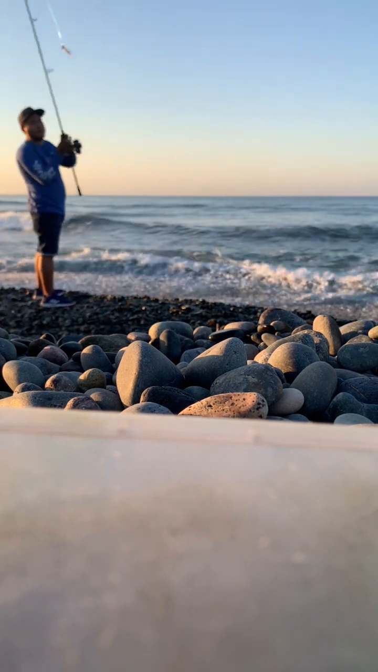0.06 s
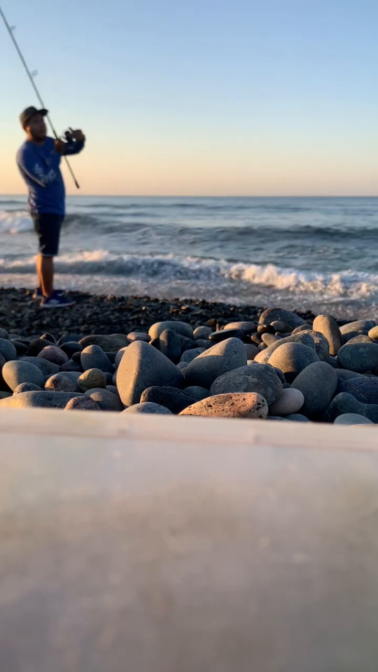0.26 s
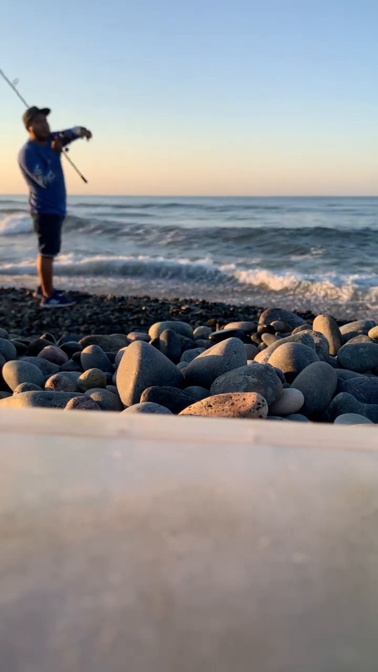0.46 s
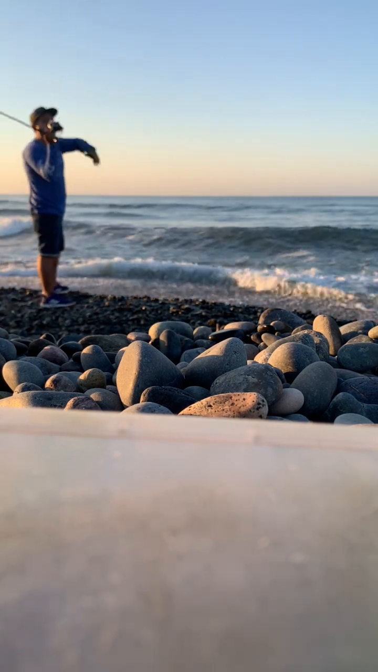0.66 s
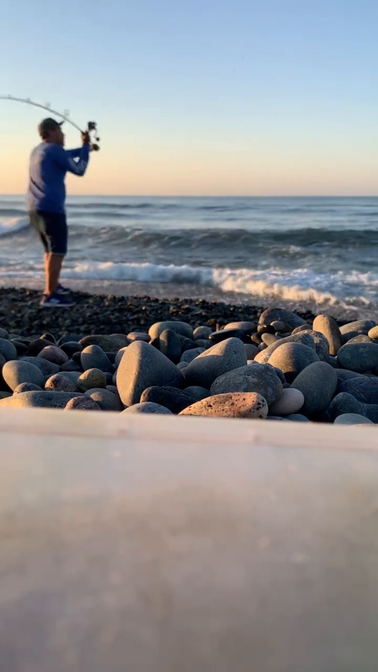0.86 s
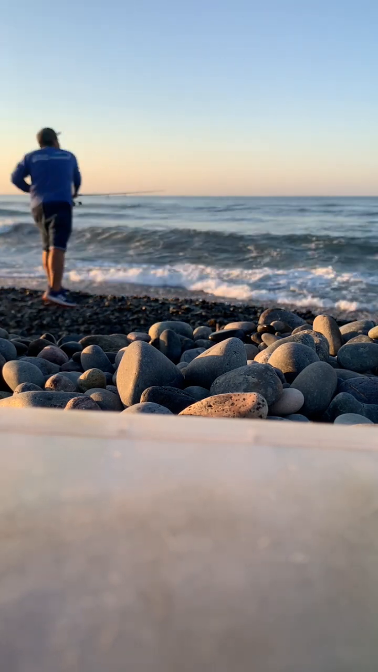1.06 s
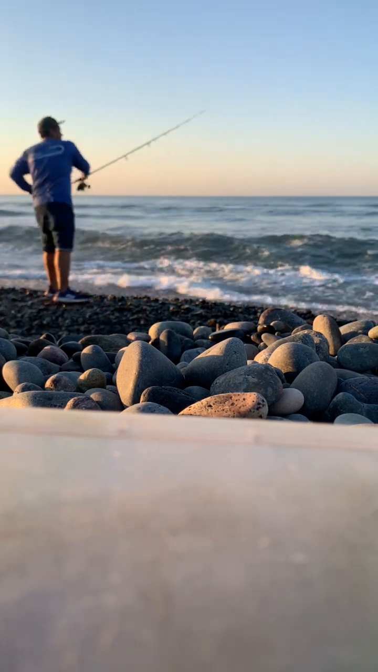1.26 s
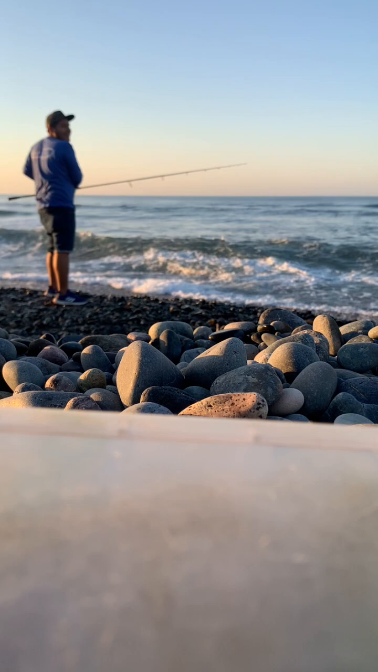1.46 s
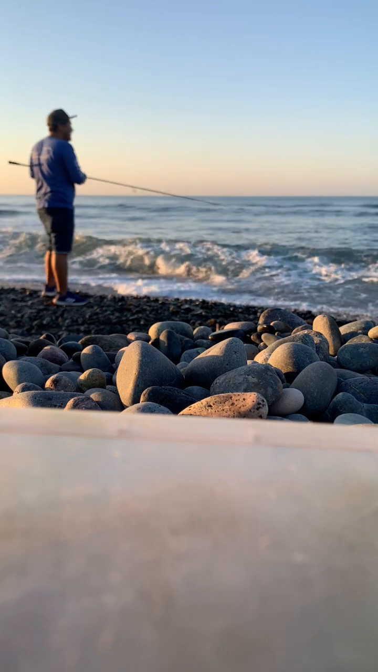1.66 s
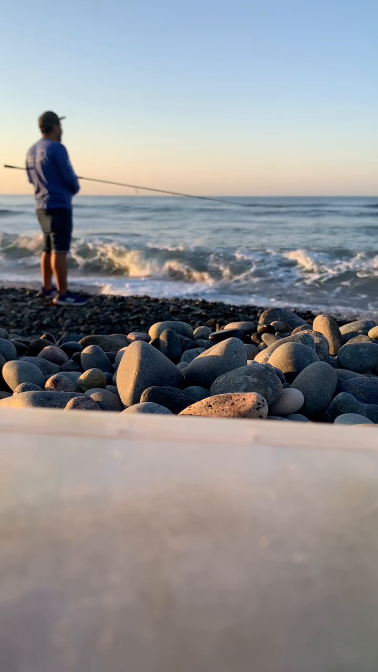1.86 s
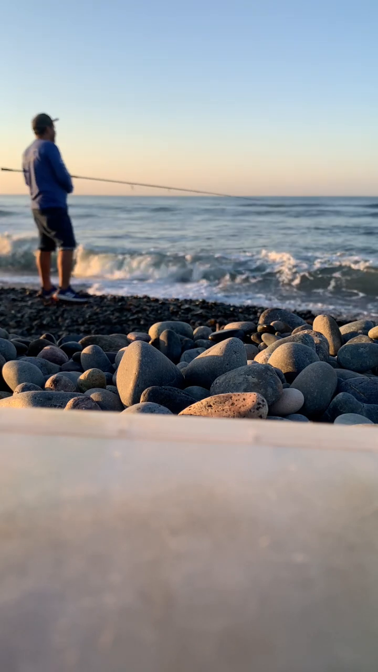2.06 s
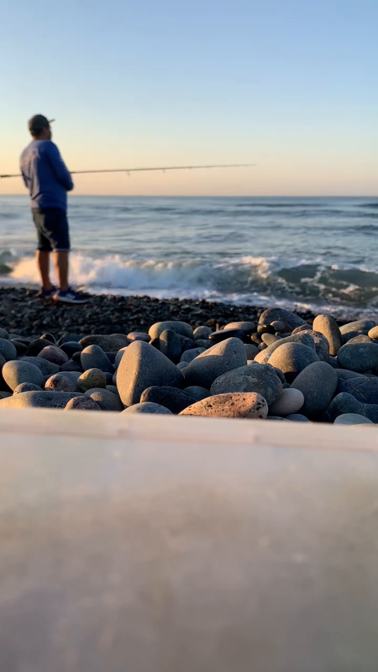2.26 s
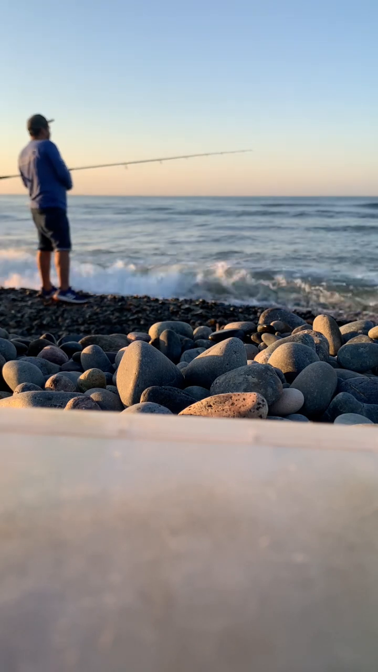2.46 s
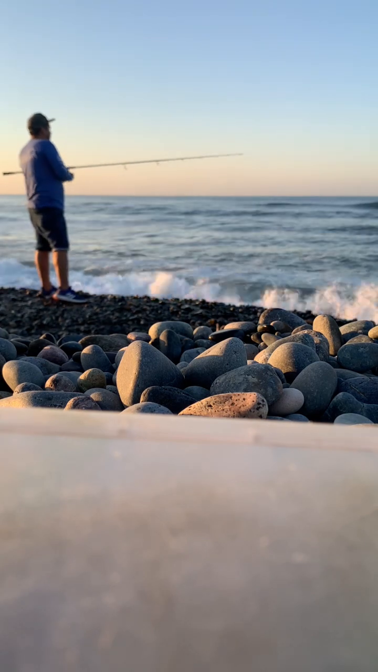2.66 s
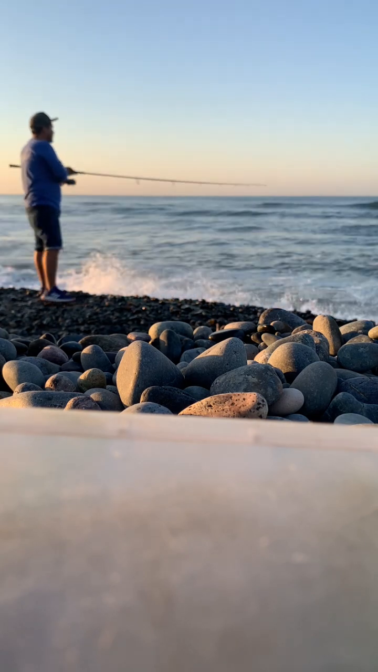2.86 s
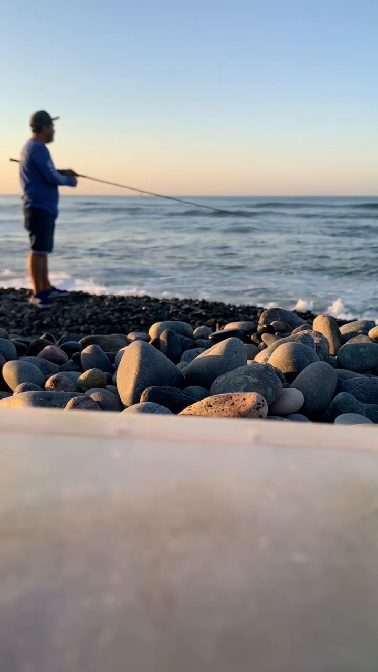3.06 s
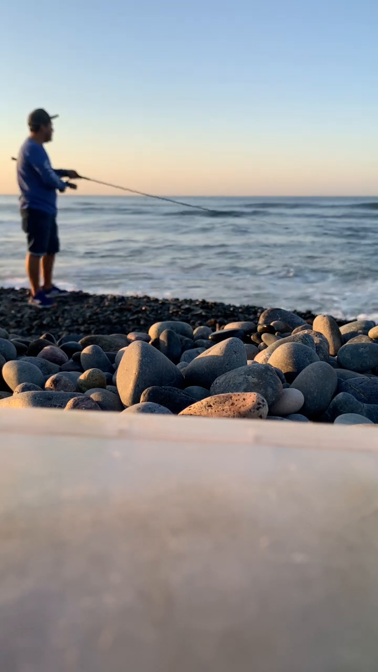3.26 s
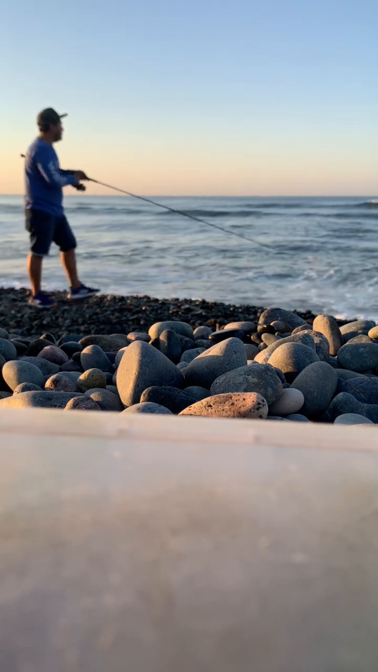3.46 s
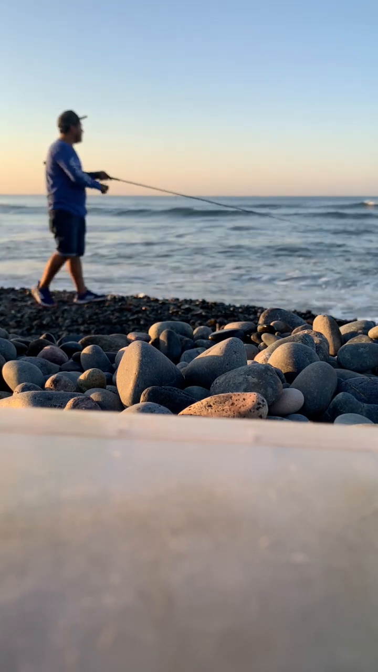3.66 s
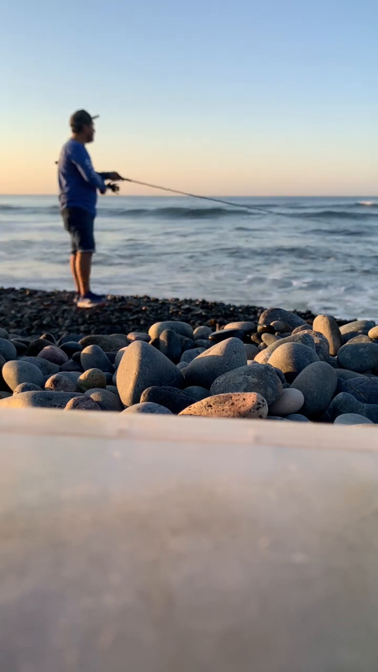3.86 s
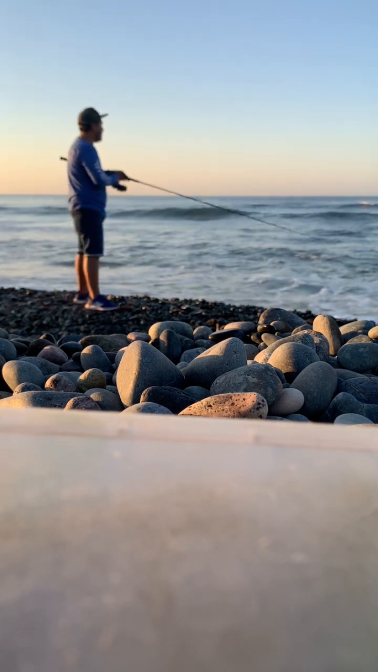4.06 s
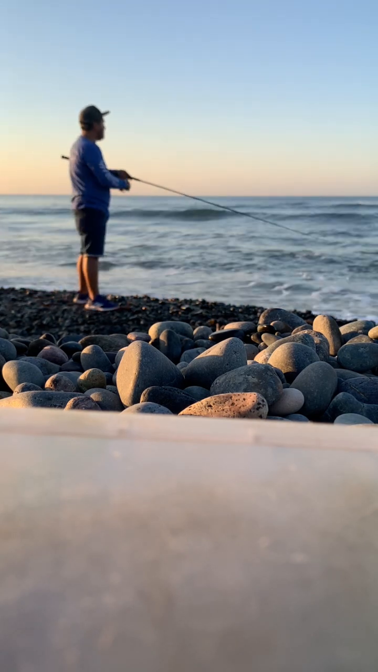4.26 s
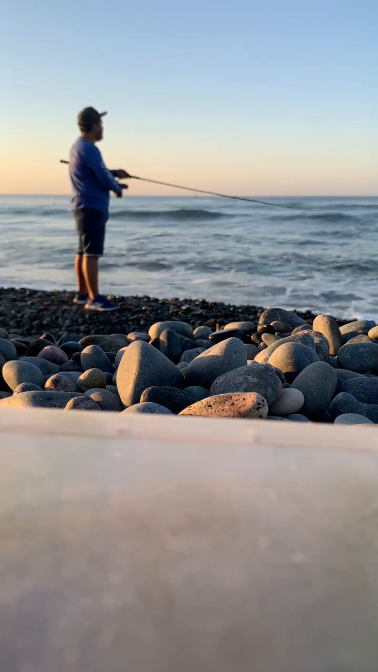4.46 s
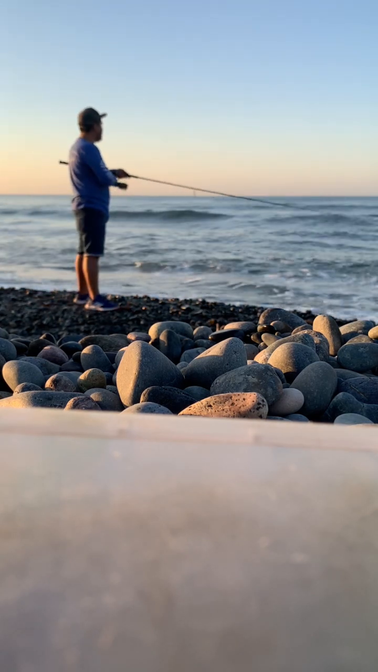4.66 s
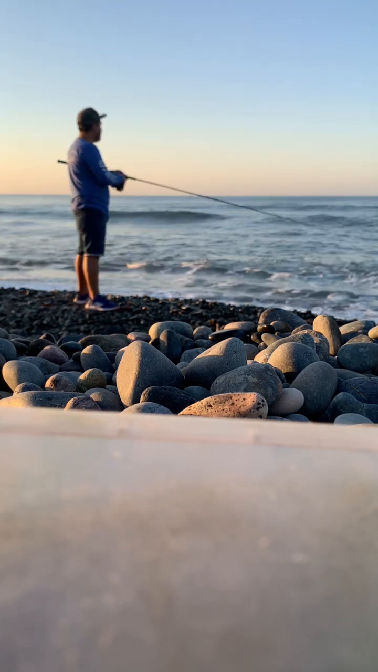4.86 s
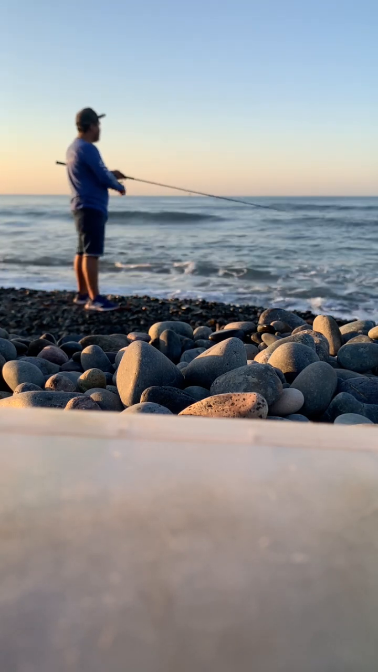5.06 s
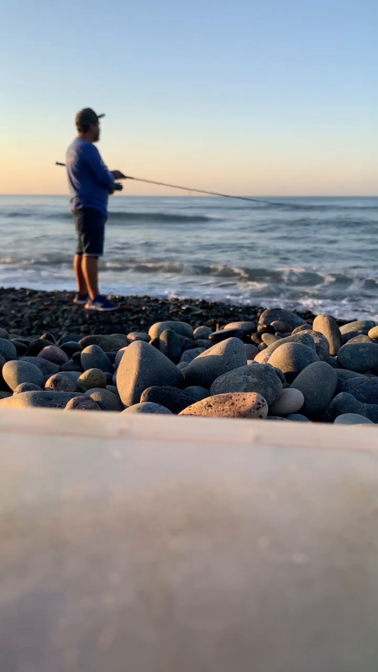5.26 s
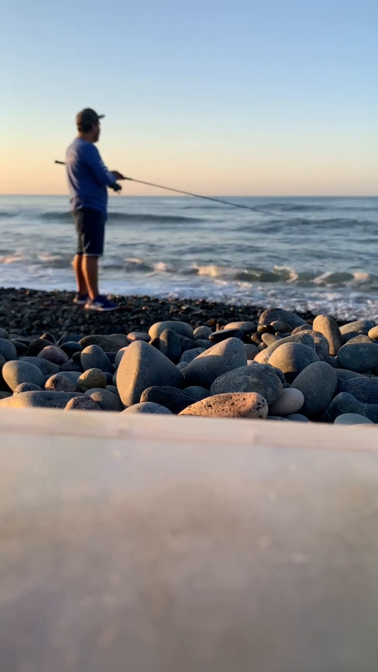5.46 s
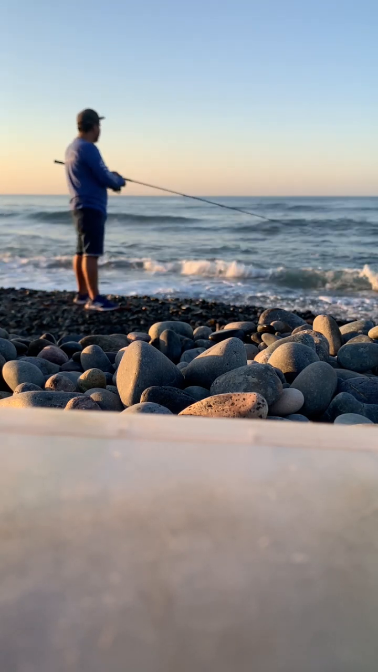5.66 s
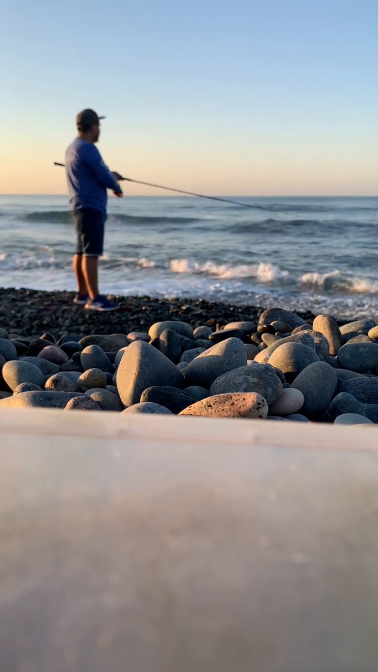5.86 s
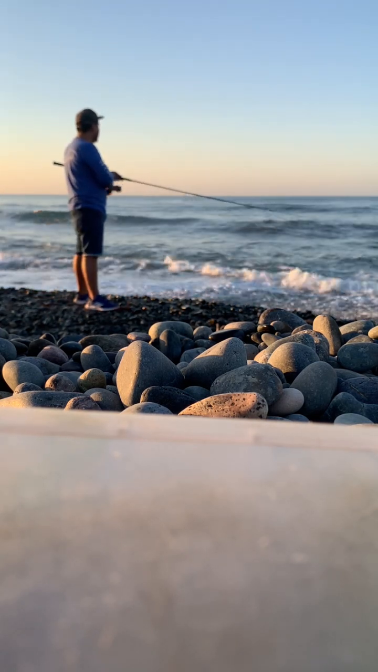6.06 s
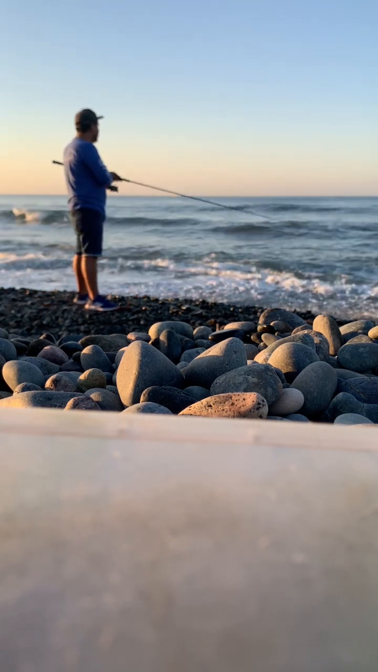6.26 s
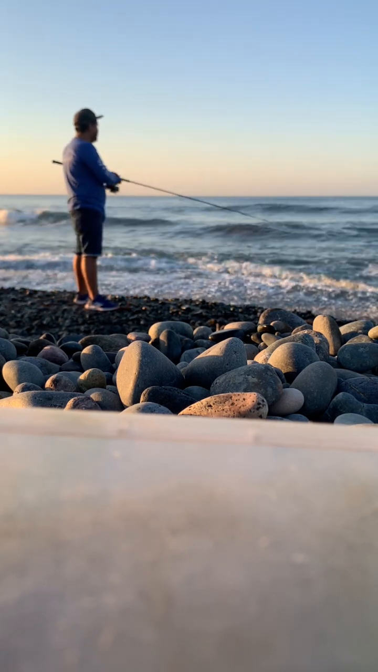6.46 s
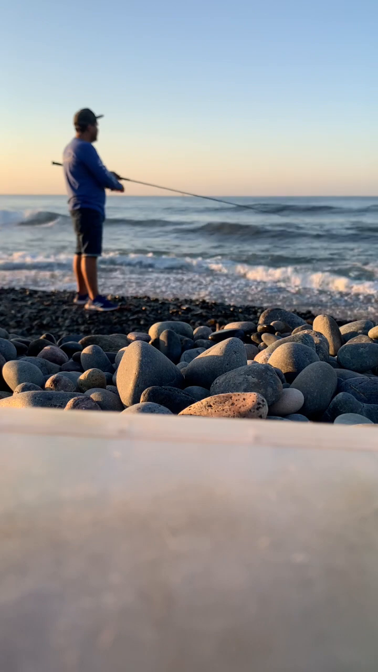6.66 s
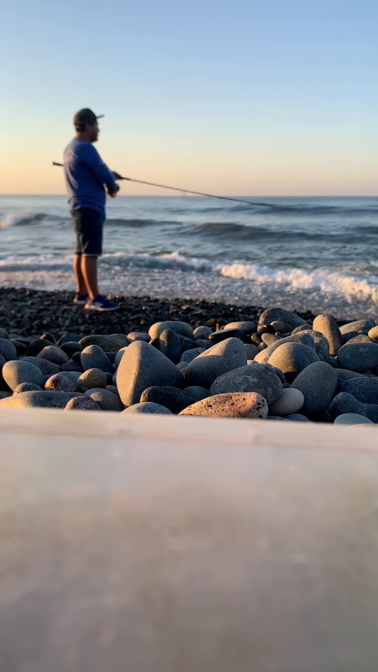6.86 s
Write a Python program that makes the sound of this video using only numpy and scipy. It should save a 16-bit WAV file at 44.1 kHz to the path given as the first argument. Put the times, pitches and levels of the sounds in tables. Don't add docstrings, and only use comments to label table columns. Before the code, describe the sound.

Close surf on a cobble beach, outdoors. Breakers rumble and foam, then a very brief whistling swish of a fishing rod and a small click. A bigger wave collapses with low gulping thuds, then drops away into a lull where fine reel ticks and stone knocks show. Hiss rises again through the stones and another wave breaks. Phone microphone a few metres up the shore, stereo, natural.

```python
import sys
import numpy as np
from scipy import signal
from scipy.fft import rfft, irfft, next_fast_len
from scipy.io import wavfile
from scipy.ndimage import uniform_filter1d

SR = 44100
rng = np.random.default_rng(int(sys.argv[2]) if len(sys.argv) > 2 else 0)


def generate_wav(sig):
    pcm = np.round(np.clip(np.atleast_2d(sig).T, -1, 1) * 32767).astype(np.int16)
    wavfile.write(sys.argv[1], SR, pcm)


def invert_db(level):
    return 10 ** (np.asarray(level, dtype=float) / 20)


N = 304731
SIZE = next_fast_len(N)
HZ = np.maximum(np.arange(SIZE // 2 + 1) * SR / SIZE, 1)
USUAL_DB = -27

# (time [s], level [dB])
CHURN_LEVEL = [(0.0, -26.5), (0.3, -22), (0.8, -22), (1.0, -26), (1.78, -26.5), (1.98, -20.5), (2.5, -21),
               (2.92, -20), (3.02, -27.5), (3.4, -32), (3.7, -30.5), (4.0, -35), (4.4, -32.5), (4.9, -31.5),
               (5.6, -30), (6.22, -29), (6.5, -26), (6.91, -23)]
# (time [s], level [dB])
FLOW_LEVEL = [(0.0, -26), (0.83, -27.5), (1.54, -33), (2.27, -35), (2.55, -31.5), (2.68, -32), (2.92, -36),
              (3.35, -42.5), (3.6, -48), (3.8, -48), (3.98, -43), (4.18, -39), (4.3, -35.5), (4.5, -33),
              (4.94, -28.5), (5.4, -26.5), (5.9, -25.5), (6.3, -26), (6.91, -26.5)]


def over_time(table):
    return np.interp(np.arange(N) / SR, *np.transpose(table))


def on_hz(table, column):
    table = np.array(table, float)
    return np.interp(np.log(HZ), np.log(table[:, 0]), table[:, column])


def unit(x):
    return x / np.sqrt(np.mean(x[0] ** 2))


def walk(rate):
    k = int(SR / rate)
    held = np.repeat(rng.standard_normal(N // k + 1), k)
    return 1.22 * uniform_filter1d(uniform_filter1d(held, k), k)[:N]


def lagging(x, lag_s):
    k = 1 / (max(lag_s, .01) * SR)
    return x[0] + signal.lfilter([k], [1, k - 1], x - x[0])


def bursts(per_s, spread_db):
    hit = rng.random((2, N)) < per_s / SR
    return hit * rng.standard_normal((2, N)) * invert_db(spread_db * rng.exponential(size=(2, N)))


def water(colour, per_s, spread_db, surge_db, flicker_db, flicker_per_s):
    low_hz, high_hz = colour[0][0], colour[-1][0]
    crowd = rfft(bursts(per_s, spread_db), SIZE) * invert_db(on_hz(colour, column=1))
    crowd *= (HZ > .7 * low_hz) & (HZ < 1.4 * high_hz)
    surge = surge_db * walk(16)
    out = 0
    for centre in np.arange(np.floor(2 * np.log2(low_hz)) - 1, 2 * np.log2(high_hz) + 2):
        band = np.cos(np.pi / 2 * np.clip(2 * np.log2(HZ) - centre, -1, 1)) ** 2
        flicker = flicker_db * walk(flicker_per_s)
        out = out + irfft(crowd * band, SIZE)[:, :N] * invert_db(surge + flicker)
    return unit(out)


def slaps():
    # (time [s], rise of the churn [dB])
    lips = [(0.0, 4.5), (0.07, 0), (0.31, -1), (0.5, -0.5), (0.77, -1.5), (0.92, 1), (1.87, 0), (2.5, 0.5),
            (2.67, 0.5), (2.71, 0), (5.39, 0), (5.7, 2), (5.92, 3), (6.3, 1), (6.54, 1), (6.7, 0.5)]
    rise_s, fall_s = 0.015, 0.12
    out = 0
    for s, db in lips:
        t = np.arange(N) / SR - s
        out = out + db * np.exp(np.minimum(t / rise_s, -t / fall_s))
    return out


def thud(slap_db):
    # (frequency [Hz], density [dB per Hz])
    thud_colour = [(80, -26), (120, -13.5), (170, -2.5), (250, -2.5), (350, -2.5), (500, -6.5),
                   (800, -13.5)]
    crowd = water(thud_colour, 5000, spread_db=1.0, surge_db=.2, flicker_db=.4, flicker_per_s=6)
    return invert_db(over_time(CHURN_LEVEL) + slap_db + 2) * crowd


def roar(slap_db):
    # (frequency [Hz], density [dB per Hz])
    roar_colour = [(150, -18), (250, -15), (400, -7), (550, -3.5), (760, -0.5), (1000, -5), (1200, -9),
                   (1500, -9), (2000, -16.5), (3000, -26), (4500, -32), (6000, -70)]
    # (time [s], level [dB])
    foam_level = [(0.0, -23.5), (.3, -22.5), (.92, -21.5), (1.05, -22), (1.4, -26.5), (1.8, -23),
                  (2.05, -18.5), (2.6, -16.5), (2.88, -16.5), (3.02, -19.5), (3.38, -20.5), (3.7, -25),
                  (4.25, -30.5), (4.85, -30.5), (5.2, -25), (5.85, -23.5), (6.2, -24), (6.91, -21.5)]
    crowd = water(roar_colour, 14000, spread_db=1.0, surge_db=.3, flicker_db=.6, flicker_per_s=9)
    return invert_db(over_time(foam_level) + slap_db) * crowd


def wash(slap_db):
    # (frequency [Hz], density [dB per Hz])
    wash_colour = [(700, -24), (1200, -1), (1600, -0.5), (2050, 0), (2500, -1.5), (3100, -2.5), (3800, -6),
                   (5000, -13), (6200, -21), (7000, -14), (9000, -24), (12000, -33), (16000, -56)]
    crowd = water(wash_colour, 22000, spread_db=1.77, surge_db=0.77, flicker_db=0.54, flicker_per_s=14)
    return invert_db(over_time(FLOW_LEVEL) + 0.33 * slap_db + 5) * crowd


def trickle():
    # (frequency [Hz], density [dB per Hz])
    gap_colour = [(2200, -15), (2700, -3.5), (3200, 0), (3900, -3.5), (4800, -14)]
    crowd = water(gap_colour, 5000, spread_db=2.5, surge_db=0.1, flicker_db=0.6, flicker_per_s=20)
    flow_db = over_time(FLOW_LEVEL)
    rise_db = np.clip(flow_db - lagging(flow_db, lag_s=0.38), -6, 9)
    return invert_db(flow_db - 6 + 0.85 * rise_db) * crowd


def spray(slap_db):
    # (frequency [Hz], density [dB per Hz])
    spray_colour = [(4000, -0.5), (6000, 6), (8000, 6.5), (10000, 5), (12000, 3), (14000, 2), (15000, 0),
                    (16000, -10)]
    # (time [s], level [dB])
    fizz_level = [(0.0, -42), (0.36, -39.5), (0.88, -39.5), (1.56, -44), (1.77, -43.5), (2.29, -42),
                  (2.64, -42), (2.77, -41), (3.02, -47.5), (3.21, -53.5), (3.33, -57.5), (3.66, -62),
                  (4.29, -64), (4.7, -55), (4.98, -48.5), (5.96, -43), (6.2, -44.5), (6.91, -40)]
    near = water(spray_colour, 30000, spread_db=1.3, surge_db=.4, flicker_db=.7, flicker_per_s=22)
    elsewhere = near[:, ::-1]
    far = signal.sosfilt(signal.butter(6, 13200, fs=SR, output="sos"), elsewhere)
    mist = signal.sosfilt(signal.butter(3, 14000, "high", fs=SR, output="sos"), elsewhere)
    near_db = over_time(fizz_level) + 7.5 + 0.85 * slap_db
    mist_db = -29 + 0.71 * (over_time(CHURN_LEVEL) - USUAL_DB) + near_db - USUAL_DB
    return invert_db(near_db) * near + invert_db(mist_db) * mist + invert_db(-53) * far


def plops(table, cycles):
    out = np.zeros(N)
    for s, db, hz in table:
        turn = np.arange(int(6 * cycles * SR / hz)) * hz / SR
        shape = 3 * turn / cycles * np.exp(1 - 3 * turn / cycles)
        at = int(s * SR)
        out[at:at + len(turn)] += invert_db(db) * shape * np.sin(2 * np.pi * turn * (1 + 0.0099 * turn))
    return out


def pockets():
    # (time [s], peak [dB], pitch [Hz])
    crushed = [(.07, -18, 306), (.377, -21, 197), (.5, -18, 232), (.909, -21.5, 186), (1.837, -17.5, 220),
               (1.938, -18, 138), (2.02, -15, 198), (2.09, -22, 332), (2.24, -16, 158), (2.31, -17, 210),
               (2.49, -17, 151), (2.5, -13, 330), (2.66, -22, 400), (2.72, -21, 191), (2.8, -9, 420),
               (2.84, -19, 242), (2.91, -15, 170), (4.501, -28, 164), (5.093, -22, 312), (5.15, -25, 418),
               (5.275, -33, 177), (5.381, -22, 233), (5.534, -25, 233), (5.62, -22, 170), (5.727, -26, 133),
               (5.895, -15, 239), (6.294, -20, 121), (6.37, -18, 190), (6.537, -19, 134),
               (6.55, -12.5, 249), (6.65, -18, 256)]
    return plops(crushed, cycles=4.4)


def whistles():
    # (time [s], share of the fastest [0-1])
    tip_speed = [(.72, .67), (.745, .73), (.765, .9), (.783, .99), (.79, 1), (.81, .89), (.83, .79),
                 (.855, .69)]
    # (start [s], length [s], pitch at the fastest [Hz], peak [dB])
    sections = [
        (.717, .052, 2090, -12),
        (.749, .034, 1615, -6),
        (.785, .042, 1540, -7),
        (.818, .020, 1560, -19),
        (.750, .020, 2760, -13),
        (.797, .028, 2560, -19),
        (.768, .014, 1060, -17),
        (.865, .022, 2700, -22),
        (.795, .014, 1000, -21),
        (.786, .012, 2560, -20),
    ]
    out, speed = np.zeros(N), uniform_filter1d(over_time(tip_speed), size=400)
    for start, length, top_hz, db in sections:
        at, n = int(start * SR), int(length * SR)
        hz = top_hz * speed[at:at + n] * (1 + 0.0034 * walk(250)[:n])
        out[at:at + n] += invert_db(db) * np.hanning(n) ** 0.72 * np.sin(2 * np.pi * np.cumsum(hz) / SR)
    return out


def ticks():
    # (time [s], peak [dB], body ring re usual [dB])
    snaps = [(0.995, -22, 4), (1.001, -12, -8), (2.2977, -6, -17), (2.363, -25, 3), (3.3136, -23, -11),
             (3.571, -33, -5.5), (3.6598, -32, -4), (3.6722, -25, -8), (3.6747, -19, -8),
             (3.6772, -19, -12), (3.6808, -23, 1), (3.683, -17, -11), (3.696, -20, -7), (3.707, -25, -6),
             (3.7214, -36, 0), (4.0474, -36, -2), (4.146, -42, -8), (4.3325, -27, -15), (4.4648, -17, -21),
             (4.4693, -15, -23), (4.4765, -32, -10), (4.4942, -22, -18), (5.2742, -14, -8),
             (5.3015, -19, -8), (6.2985, -10, -14), (6.315, -17, -12)]
    # (frequency [Hz], t60 [s], level [dB])
    wire_modes = [(11400, 0.004, 2), (12700, 0.0047, 0), (13800, 0.0045, 3), (15200, .003, 1)]
    # (frequency [Hz], t60 [s], level [dB])
    body_modes = [(3640, 0.0038, 12), (5500, 0.0062, 5), (7260, 0.0037, 14)]
    out, t = np.zeros(N), np.arange(900) / SR
    onset = 1 - np.exp(-t / .0003)
    for (s, db, body_db), chance in zip(snaps, rng.standard_normal((len(snaps), 7))):
        modes = list(wire_modes) + [(hz, t60, g + body_db) for hz, t60, g in body_modes]
        ring = 0
        for (hz, t60, g), c in zip(modes, chance):
            decay = np.exp(-np.log(1000) * t / t60)
            ring = ring + invert_db(g) * decay * np.sin(2 * np.pi * hz * (1 + 0.041 * c) * t)
        at = int(s * SR)
        out[at:at + len(t)] += invert_db(db - 4.0) * ring * onset
    return out


def rustles():
    # (start [s], length [s], centre [Hz], width [Hz], rms [dB])
    puffs = [(0.718, 0.058, 7000, 700, -30), (.740, 0.034, 5300, 900, -34),
             (0.991, 0.022, 13000, 6000, -32), (0.991, 0.022, 6900, 3200, -30),
             (.790, .040, 5300, 600, -35), (.790, .035, 7000, 700, -38), (0.992, .016, 3700, 2600, -30),
             (3.566, .018, 9000, 9000, -44), (3.588, .018, 9000, 8000, -44), (3.655, .014, 4600, 700, -43),
             (3.670, .018, 4500, 6000, -43), (3.650, 0.040, 12500, 5000, -45),
             (4.045, .020, 9500, 7000, -46), (4.075, .018, 9500, 7000, -47), (4.140, .022, 9000, 7000, -47),
             (4.325, .014, 11000, 8000, -43), (4.452, 0.016, 6500, 900, -41),
             (4.464, .012, 7600, 1400, -41), (2.56, .17, 3400, 1800, -35), (2.33, .1, 13000, 5000, -43),
             (3.0, .06, 9000, 10000, -44), (4.490, .030, 9000, 5000, -45)]
    out = np.zeros((2, N))
    grit = unit(bursts(9000, spread_db=2.5))
    for start, length, hz, width_hz, db in puffs:
        at, n = int(start * SR), int(length * SR)
        edges = [max(hz - width_hz / 2, 500), min(hz + width_hz / 2, .45 * SR)]
        band = signal.butter(3, edges, "band", fs=SR, output="sos")
        puff = signal.sosfilt(band, grit[:, at - 400:at + n])[:, 400:]
        swell = np.hanning(n) ** .4 * invert_db(2 + 2.5 * walk(120)[:n])
        out[:, at:at + n] += invert_db(db) * unit(puff) * swell
    return out


def knocks():
    # (time [s], peak [dB], pitch [Hz])
    stones = [
        (.996, -28, 3900),
        (2.3615, -26, 5600),
        (2.3615, -23, 3000),
        (2.7077, -24, 3600),
        (3.6571, -31, 4460),
        (3.682, -24, 2220),
        (3.682, -27, 4180),
        (4.4169, -23, 2960),
        (4.6937, -19, 3410),
        (5.274, -28, 6600),
    ]
    return plops(stones, cycles=6.5)


def boom():
    # (frequency [Hz], density [dB per Hz])
    boom_colour = [(25, -42), (50, -32), (80, -13), (120, -1), (160, -6), (220, -15)]
    # (time [s], level [dB])
    swell_level = [(0.0, -28.5), (0.5, -31.5), (0.9, -32), (1.2, -36.5), (1.8, -35.5), (2.0, -26.5),
                   (2.9, -23), (3.02, -33), (3.5, -37), (3.9, -42), (4.15, -35.5), (4.7, -34), (5.3, -39),
                   (6.2, -34), (6.32, -31), (6.6, -24.5), (6.91, -33)]
    crowd = water(boom_colour, 3000, spread_db=1.0, surge_db=.2, flicker_db=.4, flicker_per_s=5)
    return invert_db(over_time(swell_level) - 0.5) * crowd


def scene():
    slap_db = slaps()
    sea = thud(slap_db) + roar(slap_db) + wash(slap_db) + trickle() + spray(slap_db) + boom()
    close = pockets() + whistles() + ticks() + knocks()
    return sea + rustles() + np.array([close, np.zeros(N)])


def band_limit(x):
    return signal.sosfilt(signal.butter(12, 15900, fs=SR, output="sos"), x)


def record(dry):
    # (frequency [Hz], left minus right [dB], right leads [rad], likeness [0-1])
    port_table = [(120, 0.9, 0, 1), (380, 3.8, 0.2, .99), (750, 3.4, 0.65, 0.94), (900, 1, 1.2, .93),
                  (1150, 0.8, 2, .82), (1450, -1, 2.1, .8), (1750, -6, 1.6, 0.62), (2030, -2, 3.3, .8),
                  (2350, -2.5, 4.7, 0.38), (3000, -.5, 6, 0.93), (4300, -2, 5.5, .82), (5200, -4, 5, 0.6),
                  (6500, .7, 5, .78), (8000, 0, 4.3, 0.68), (9000, 0, 3.1, 0.99), (10300, 0, 3.1, 0.95),
                  (11200, 0.3, 1.6, 0.3), (12000, 0, 1.1, .6), (12700, 0, 0.7, 1)]
    front, around = rfft(dry, SIZE)
    tilt_db, lead, like = (on_hz(port_table, column=k) for k in (1, 2, 3))
    like = np.clip(like, 0, 1)
    shared = np.sqrt((1 + like) / 2) * front
    apart = np.sqrt((1 - like) / 2) * around
    left = (shared + apart) * invert_db(tilt_db / 2)
    right = (shared - apart) * invert_db(-tilt_db / 2) * np.exp(1j * lead)
    ports = irfft(np.array([left, right]), SIZE)[:, :N]
    ports = ports / (1 + np.abs(ports / .95) ** 6) ** (1 / 6)
    return band_limit(ports)


dry = scene()
out = record(dry)
generate_wav(out)
```